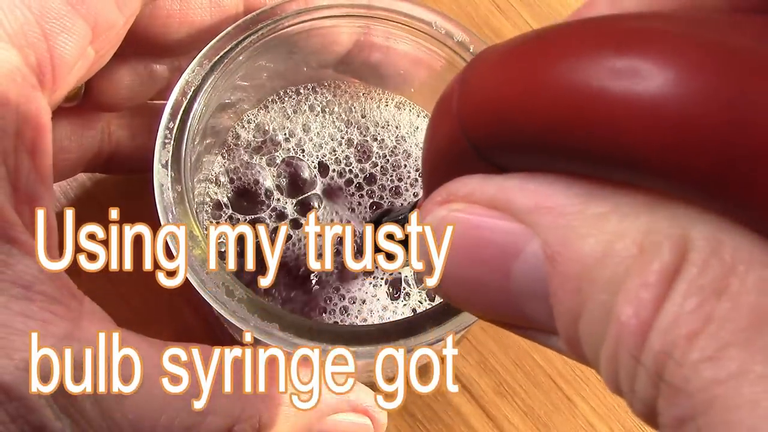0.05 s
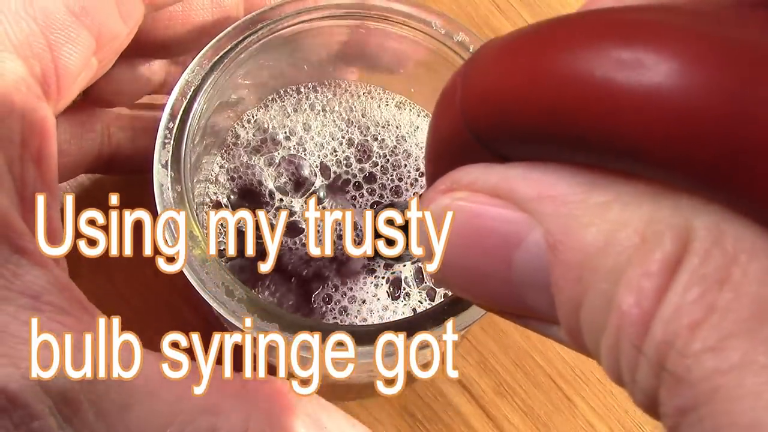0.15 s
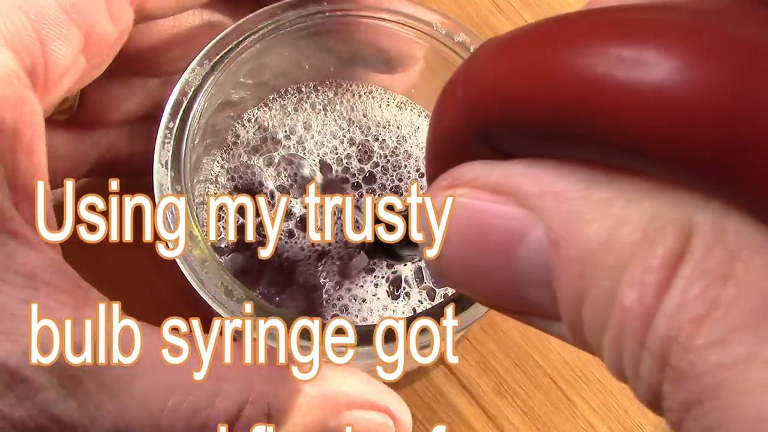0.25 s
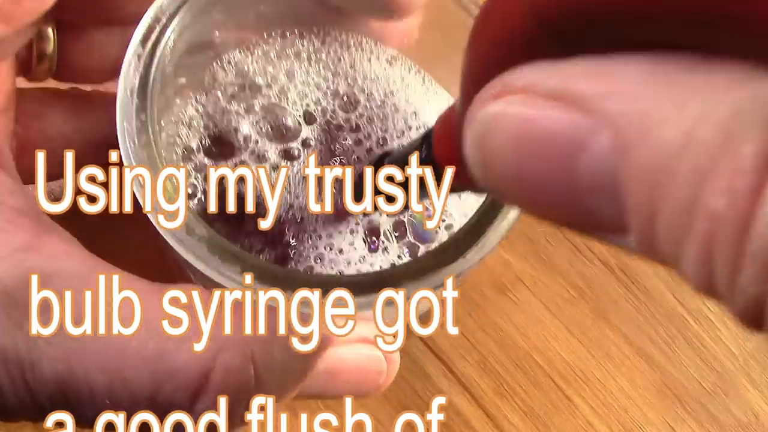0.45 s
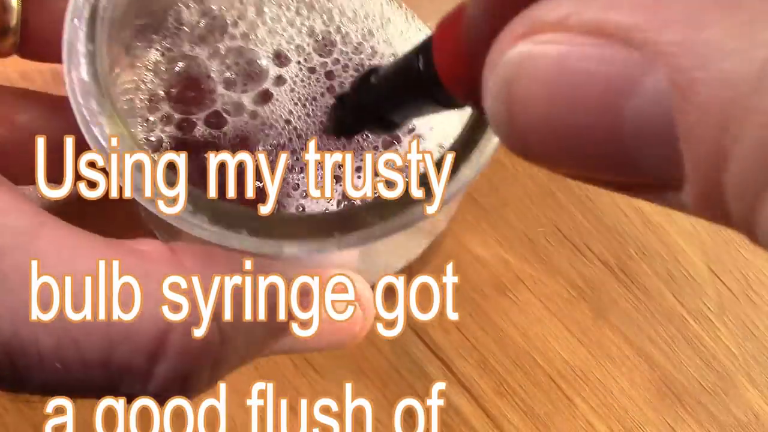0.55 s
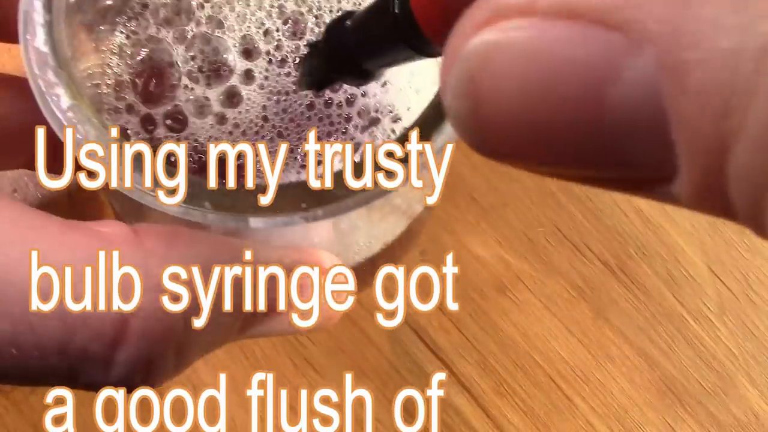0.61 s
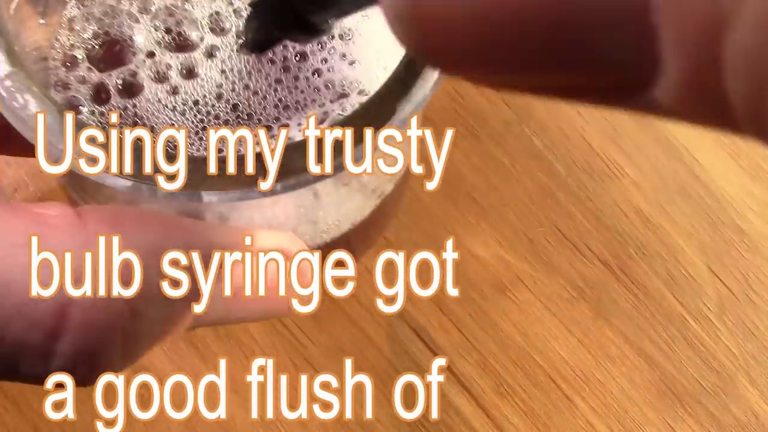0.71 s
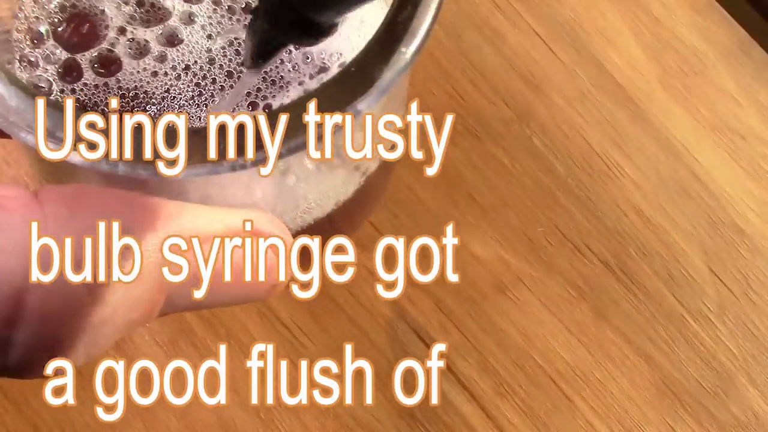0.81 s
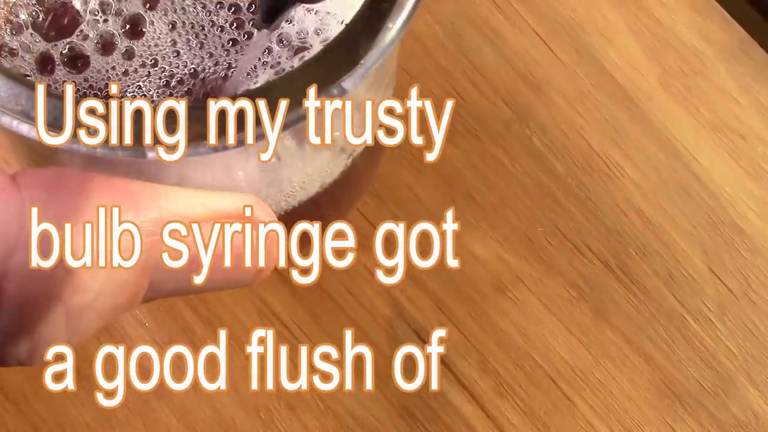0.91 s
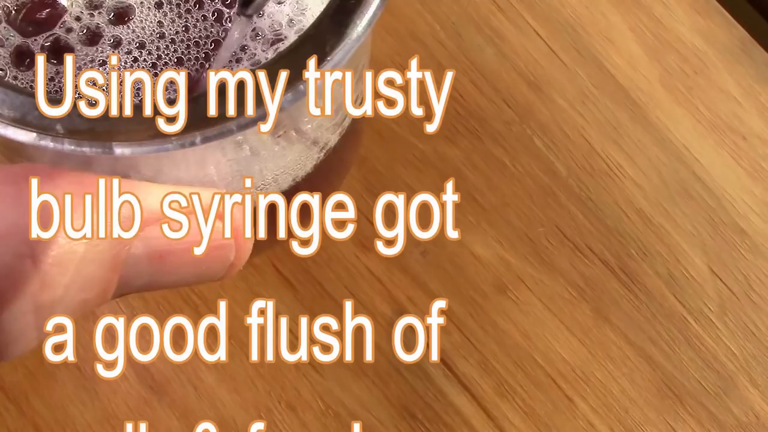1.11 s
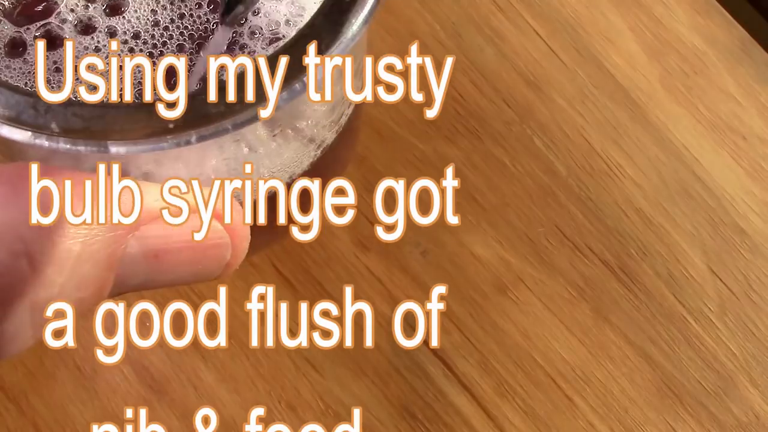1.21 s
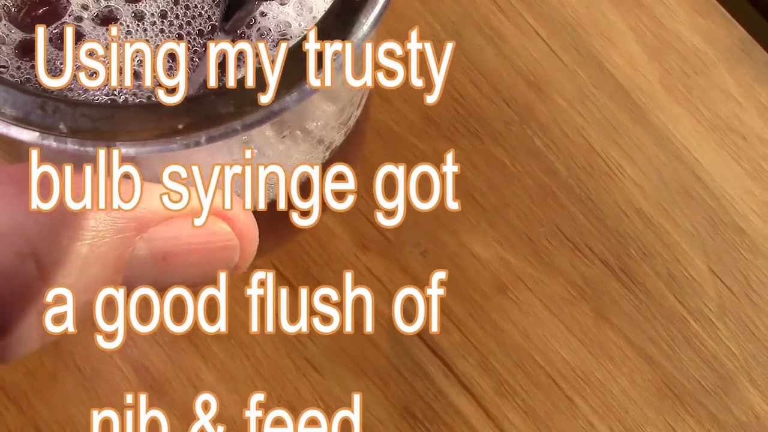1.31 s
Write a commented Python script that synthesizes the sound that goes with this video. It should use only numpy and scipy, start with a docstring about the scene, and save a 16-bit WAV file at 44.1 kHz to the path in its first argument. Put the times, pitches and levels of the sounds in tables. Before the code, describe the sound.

A bulb syringe spurts air into a cup of foamy liquid, close up. The rubber buckles with soft thuds around 0.2 seconds, followed by a light tick. From 0.4 to 0.6 seconds comes a loud hiss with rapid gurgling, ended by a sharp click. A faint whistle leaks near 0.8 seconds, then small bubbles plip and foam fizzes softly until about 1.35 seconds, over a low room hum.

```python
"""Indoors, in a small room, a rubber bulb syringe is squeezed into a cup of foamy liquid.
The bulb buckles with soft thuds and the nozzle ticks; air spurts out in a turbulent hiss and blows
a rapid gurgle of bubbles. A sharp click of hard parts ends the spurt and a thin leak whistles.
Then small bubbles plip and bursting foam fizzes, over a low room rumble and hum."""
import sys
import numpy as np
from scipy import signal
from scipy.io import wavfile

SR = 44100
rng = np.random.default_rng(int(sys.argv[2]) if len(sys.argv) > 2 else 0)


def dump_mix(stems):
    """Bounce the given channels to the path in sys.argv[1] as a 16-bit WAV at rate SR."""
    frames = np.atleast_2d(stems).T  # one column per channel
    limited = np.clip(frames, -1, 1)  # hard clip at full scale
    pcm = np.round(limited * 32767).astype(np.int16)
    wavfile.write(sys.argv[1], SR, pcm)


N = 59535
T = np.arange(N) / SR


# Air flow through the nozzle, the spurt's envelope: time_s, level_db
AIR_FLOW = [(0.405, -60), (0.416, -40), (0.422, -23.5), (0.436, -22.5), (0.447, -19.5), (0.470, -19),
            (0.505, -19.5), (0.527, -16.5), (0.550, -19.5), (0.578, -20.5), (0.590, -27.5), (0.607, -32),
            (0.618, -32.5), (0.630, -53)]
# Bubbles blown by the spurt: start_s, relative_peak_db, pitch_hz, swell_s
GULP_BUBBLES = [(0.4100, -25, 1400, 0.0027), (0.4183, -5, 1400, 0.0011), (0.4228, -19, 1530, 0.00079),
                (0.4270, -22, 1370, 0.0025), (0.4333, -4, 1520, 0.0007), (0.4397, -10, 1410, 0.0014),
                (0.4445, -10.5, 1390, 0.0014), (0.4485, -4.5, 1454, 0.0019), (0.4542, -18, 1430, 0.0026),
                (0.4610, -8, 1434, .003), (0.4768, -2.5, 1470, 0.0025), (0.4935, -4.5, 1490, 0.0016),
                (0.4982, -0.5, 1425, 0.0024), (0.5125, -6, 1320, 0.0026), (0.5190, -26, 1620, .002),
                (0.5308, -3, 1420, 0.0021), (0.5356, -13, 1380, 0.0024), (0.5465, -5, 1204, 0.0013),
                (0.5508, -15, 1320, 0.0013), (0.5632, -6, 1400, 0.002), (0.5688, 0, 1413, 0.0013),
                (0.5735, -18, 1380, 0.00079), (0.5794, -0.5, 1370, 0.0011), (0.5838, -3, 1444, 0.002),
                (0.5965, -11, 1367, .0016), (0.6010, -24, 1320, 0.0027), (0.6200, -9.5, 1340, 0.0012)]
def spurt():
    """Air rushes out of the nozzle, hissing, churning the liquid and blowing distinct gulps."""
    flow = level(AIR_FLOW)
    air = hiss(flow)
    churn = from_db(-3.5) * bubble_cloud(per_s=1200, hz=1400, spread=0.23, cycles=32)
    gulps = from_db(-4) * bubbles(GULP_BUBBLES)
    return flow * (air + churn) + gulps


# Tone colour of the rushing air: frequency_hz, density_db
HISS_COLOUR = [(150, -4.5), (400, -2.5), (700, -10), (1500, 1), (2000, -6), (2600, -13), (3200, -4.5),
               (3800, -6), (4500, -5), (5100, -5.5), (6100, -9), (7800, -2), (9500, -7.5), (12000, -6),
               (15000, -10)]
# Narrow resonances of bulb and nozzle: pitch_hz, width_hz, relative_db
NOZZLE_RESONANCES = [(776, 6.7, -22), (5520, 150, -13), (6067, 21, -13), (6900, 130, -22), (7900, 93, -30),
                     (9400, 20, -34), (11400, 32, -25.5), (14600, 40, -17.5)]
def hiss(flow):
    """Sputtering air noise with narrow resonances; the jet stands out more as the flow rises."""
    air = from_db(-4) * coloured_noise(HISS_COLOUR, flicker_db=2.5, flicker_hz=70)
    air += from_db(-4.5) * (flow / flow.max()) ** 0.79 * jet()
    for hz, width_hz, db in NOZZLE_RESONANCES:
        air += from_db(db) * noise_band(hz, width_hz)
    sputter_db = 1.18 * drift(250)
    return air * from_db(sputter_db)


# Sweep of the jet's broad resonance: time_s, centre_hz
JET_SWEEP = [(0.43, 5900), (0.455, 6300), (0.472, 6900), (0.485, 6000), (0.53, 6700), (0.575, 5500)]
def jet(width_hz=2100):
    """Turbulence in the nozzle rings around a wandering centre."""
    centre_hz = np.interp(T, *np.transpose(JET_SWEEP))
    phase = 2 * np.pi * np.cumsum(centre_hz) / SR
    a, b = lowpass(rng.standard_normal((2, N)), width_hz / 2)
    return rms_one(a * np.cos(phase) + b * np.sin(phase))


# The snap and its rebounds: start_s, level_db
CLICK_HITS = [(0.6246, -4), (0.6256, 1), (0.6274, -2.5), (0.6335, -19), (0.6477, -11.5), (0.6503, -12.5)]
# Ring of the hard parts: pitch_hz, relative_db, t60_s
CLICK_RING = [(1027, -15.5, 0.027), (1560, -36, .025), (2206, -17, 0.016), (2800, -19.5, 0.012),
              (3393, -11.5, 0.011), (4570, -9, 0.01), (5380, -9.5, 0.0082), (5900, -9.5, 0.011),
              (6420, -8.5, 0.021), (8390, -11.5, 0.0088), (9870, -15.5, 0.0082), (10130, -10.5, 0.007),
              (12200, -30, 0.0045)]
def click(crack_decay_s=0.00081, dull_below_db=-10):
    """Hard parts snap together with a brief crack and a short ring; weak rebounds are duller."""
    noise = from_db(-9) * rms_one(lowpass(rng.standard_normal(N), 10200))
    out = np.zeros(N)
    for start_s, db in CLICK_HITS:
        crack = burst(start_s, db, crack_decay_s) * noise
        hit = crack + struck([(start_s, db)], CLICK_RING)
        out += lowpass(hit, 9000) if db < dull_below_db else hit
    return out


# Quick slips of the rubber: start_s, level_db
BULB_SLIPS = [(0.2152, 7.5), (0.2210, -18), (0.2268, 7), (0.2325, 2.5), (0.2590, -6.5), (0.3585, -10)]
# Low body of the bulb: pitch_hz, relative_db, t60_s
BULB_RING = [(185.7, -32.5, 0.12), (319, -29.5, 0.049), (430, -23.5, 0.024), (587, -30, 0.005)]
def bulb_thuds():
    """The bulb buckles in a few slips, each a soft thud."""
    return struck(BULB_SLIPS, BULB_RING)


# Tick ahead of the spurt: start_s, level_db
TICK_HITS = [(0.3556, 1)]
# Ring of the nozzle: pitch_hz, relative_db, t60_s
TICK_RING = [(3420, -15.5, .0045), (6900, -19, 0.0019), (1690, -32, 0.012)]
def nozzle_tick():
    """One light hit rings the nozzle for an instant."""
    return struck(TICK_HITS, TICK_RING)


# Handling bumps: start_s, level_db, decay_s
CUP_BUMPS = [(0.2570, -36, 0.028), (0.3580, -32.5, 0.026), (0.632, -26.5, 0.024), (0.6856, -23.5, 0.0019),
             (0.737, -29, 0.0016)]
# Their dull colour: frequency_hz, density_db
BUMP_COLOUR = [(60, -9), (160, 3), (310, 4.5), (550, -7), (900, -19), (1500, -16.5), (3000, -32),
               (10000, -41)]
def cup_bumps():
    """Handling knocks the cup: dry thumps without a pitch."""
    return sum(burst(*bump) for bump in CUP_BUMPS) * coloured_noise(BUMP_COLOUR)


# Envelope of the rub: time_s, level_db
RUB_ENVELOPE = [(0.20, -67), (0.23, -40.5), (0.245, -45.5), (0.26, -70), (0.32, -69)]
# Its midrange colour: frequency_hz, density_db
RUB_COLOUR = [(400, -12), (1050, 3), (1600, 4), (3000, -5.5), (4500, -12), (12000, -22)]
def finger_rub():
    """Skin rubs on the rubber as the bulb buckles."""
    return level(RUB_ENVELOPE) * coloured_noise(RUB_COLOUR, flicker_db=5.3, flicker_hz=80)


# Bed of small bubbles in the cup: time_s, level_db
SIMMER_ENVELOPE = [(0, -50.5), (0.25, -56), (0.39, -61), (0.79, -52), (0.84, -45.5), (1.0, -42.5),
                   (1.1, -43), (1.35, -40.5)]
# Bubbles rising after the spurt: start_s, peak_db, pitch_hz, swell_s
PLIP_BUBBLES = [(0.8203, -26, 1670, 0.0016), (0.8336, -21.5, 1560, 0.0012), (0.8410, -30, 1440, 0.0017),
                (0.8555, -29.5, 1393, 0.0065), (0.8635, -24, 1300, 0.0014), (0.8803, -31, 1760, 0.0014),
                (0.8815, -29, 1196, 0.0031), (0.8935, -28.5, 1700, 0.0016), (0.8940, -29.5, 1140, 0.002),
                (0.9025, -29.5, 1155, 0.0024), (0.9370, -23.5, 1320, 0.00067),
                (0.9430, -29.5, 1530, 0.0024), (0.9495, -29.5, 1390, 0.0026), (0.9715, -34, 1480, 0.0013),
                (1.0158, -29.5, 1470, 0.0026), (1.0398, -26, 1450, 0.00073), (1.0510, -22.5, 1496, 0.0016),
                (1.0615, -24, 1550, 0.0013), (1.0667, -24, 1440, 0.0028), (1.0768, -21.5, 1386, 0.0052),
                (1.0888, -22, 1360, 0.0019), (1.1252, -23.5, 1470, 0.0011), (1.1368, -26, 1690, 0.0013),
                (1.1410, -34, 1266, 0.004), (1.1700, -30, 1310, 0.0046), (1.1853, -24.5, 1360, 0.0014),
                (1.1982, -25, 1610, 0.0012), (1.2215, -30.5, 1580, 0.0016), (1.2748, -24.5, 1460, 0.0015),
                (1.2915, -22.5, 1570, 0.00095)]
def bubbling():
    """Small bubbles ring in a soft simmer, with single plips on top."""
    simmer = bubble_cloud(per_s=820, hz=1478, spread=0.12, cycles=28)
    return level(SIMMER_ENVELOPE) * simmer + bubbles(PLIP_BUBBLES)


# Envelope of the fizz: time_s, level_db
FIZZ_ENVELOPE = [(0, -50), (0.27, -50), (0.33, -51), (0.41, -62), (0.80, -54), (0.86, -47.5), (0.96, -45),
                 (1.16, -44.5), (1.35, -48.5)]
# Weight of a pop by its pitch: pitch_hz, relative_db
FIZZ_COLOUR = [(2000, -7), (3200, 0.5), (5500, 4.5), (8000, 2.5), (11000, -8), (15000, -9)]
def foam_fizz():
    """Tiny bubbles burst in a dense fizz; a few ring longer, as pings."""
    pop_hz = np.geomspace(2000, 15500, 26)
    fizz = grains(pop_hz, gain_at(FIZZ_COLOUR, pop_hz), per_s=5000, cycles=7.5, spread_db=3)
    ping_hz = rng.uniform(4300, 9500, 24)
    pings = grains(ping_hz, gain_at(FIZZ_COLOUR, ping_hz), per_s=130, cycles=160, spread_db=3.5)
    return level(FIZZ_ENVELOPE) * (fizz + from_db(-8) * pings)


# Pops that stand out of the fizz: start_s, level_db, pitch_hz
FOAM_POPS = [(0.7965, -34, 6550), (0.8335, -31, 2460), (0.8733, -29, 4900), (0.9370, -26.5, 5170),
             (0.9485, -26.5, 2530), (0.9795, -27.5, 5170), (1.0173, -25.5, 4960), (1.0617, -30.5, 2980),
             (1.185, -27.5, 4800), (1.3220, -25.5, 3240)]
def foam_pops(t60_s=0.0046, snap_hz=7600):
    """A bubble's film bursts with a snap and rings briefly."""
    snap = (snap_hz, 0, t60_s / 10)
    return sum(struck([(s, db)], [(hz, 0, t60_s), snap], uneven_db=0) for s, db, hz in FOAM_POPS)


# Swell of the whistle: time_s, level_db
LEAK_ENVELOPE = [(0.72, -75), (0.745, -57), (0.80, -53), (0.83, -84)]
def nozzle_leak():
    """Air leaks at the nozzle in a thin, breathy whistle."""
    return level(LEAK_ENVELOPE) * noise_band(hz=2490, width_hz=75)


def cup_ring(liquid):
    """The air in the cup rings along with the bubbles."""
    return from_db(-6.5) * resonate(liquid, hz=1425, width_hz=45)


def room_reverb(x, t60_s=0.19, predelay_s=0.0017):
    """The small room answers with a short, diffuse, slightly dull tail."""
    tail = lowpass(rng.standard_normal(N), 8300) * (T > predelay_s) * from_db(-60 * T / t60_s)
    tail /= np.sqrt(np.sum(tail ** 2))
    return from_db(-14) * signal.fftconvolve(x, tail)[:N]


# Envelope of rumble and hum together: time_s, level_db
ROOM_ENVELOPE = [(0, -38), (0.2, -37.5), (0.4, -40.5), (0.68, -38.5), (0.85, -41.5), (1.35, -42)]
# Dark colour of the rumble: frequency_hz, density_db
RUMBLE_COLOUR = [(25, -3.5), (70, -0.5), (100, -5.5), (150, 0), (230, -17), (450, -16), (800, -20),
                 (2000, -38), (6000, -55), (15000, -48)]
# Hum tones, set against the rumble: pitch_hz, relative_db
HUM_TONES = [(75, -4), (150.5, -5.5)]
def room_tone():
    """A low, restless rumble with a hum of steady pitch."""
    hum = sum(from_db(db) * np.sin(2 * np.pi * (hz * T + rng.random())) for hz, db in HUM_TONES)
    rumble = coloured_noise(RUMBLE_COLOUR, flicker_db=2, flicker_hz=11.55)
    return level(ROOM_ENVELOPE) * (np.sqrt(2) * hum + rumble)


def bubbles(rows, steepness=1.89, sag=0.018):
    """Each bubble is a short tone that swells and dies, starting sharp and settling to its pitch."""
    out = np.zeros(N)
    for start_s, db, hz, swell_s in rows:
        age = np.maximum(T - start_s, 0) / swell_s
        turns = hz * swell_s * (age + sag * (1 - np.exp(-age)))
        envelope = (age * np.exp(1 - age)) ** steepness
        out += from_db(db) * envelope * np.sin(2 * np.pi * turns)
    return out


def bubble_cloud(per_s, hz, spread, cycles):
    """Many small bubbles around one pitch, weaker away from it; rms 1."""
    offsets = np.linspace(-1, 1, 11)
    pitches = hz * np.exp(spread * offsets)
    cloud = grains(pitches, from_db(-7 * offsets ** 2), per_s, cycles, spread_db=5)
    return rms_one(resonate(cloud, hz, width_hz=1150))


def grains(pitches, gains, per_s, cycles, spread_db):
    """Random pops of uneven size, each at one of the pitches, dying 60 dB over `cycles`; rms 1."""
    sizes = from_db(spread_db * np.minimum(rng.exponential(1, N), 4)) * rng.choice([-1, 1], N)
    pops = sizes * (rng.random(N) < per_s / SR)
    pitch_index = rng.integers(0, len(pitches), N)
    out = np.zeros(N)
    for k, (hz, gain) in enumerate(zip(pitches, gains)):
        width_hz = np.log(1000) / np.pi * hz / cycles
        out += gain * resonate(pops * (pitch_index == k), hz, width_hz) / hz
    return rms_one(out)


def struck(hits, modes, uneven_db=1):
    """Every hit rings every mode as a dying sine, its strength scattered by uneven_db."""
    start_s, db = np.transpose(hits)
    scatter_db = uneven_db * rng.standard_normal((len(hits), len(modes)))
    out = np.zeros(N)
    for k, (hz, mode_db, t60_s) in enumerate(modes):
        impulses = np.zeros(N)
        impulses[(start_s * SR).astype(int)] = from_db(db + mode_db + scatter_db[:, k])
        r, w = from_db(-60 / (t60_s * SR)), 2 * np.pi * hz / SR
        ring = signal.lfilter([0, np.sin(w)], [1, -2 * r * np.cos(w), r * r], impulses + 1e-18)
        out += (-1) ** k * ring
    return out


def coloured_noise(colour, flicker_db=0, flicker_hz=10):
    """Bands of noise, each with its own level and flicker; rms 1."""
    edges = np.geomspace(20, 18000, 41)
    white = rng.standard_normal((2, 2 * N))
    out = np.zeros(N)
    for k, (low, high) in enumerate(zip(edges, edges[1:])):
        bandpass = signal.butter(2, [low, high], "band", fs=SR, output="sos")
        band = signal.sosfilt(bandpass, white[k % 2])[N:]
        out += band * gain_at(colour, np.sqrt(low * high)) * from_db(flicker_db * drift(flicker_hz))
    return rms_one(out)


def noise_band(hz, width_hz):
    """Noise through one resonance; rms 1."""
    return rms_one(resonate(rng.standard_normal(N), hz, width_hz))


def resonate(x, hz, width_hz):
    """Band resonance with gain 1 at its peak."""
    r, w = np.exp(-np.pi * width_hz / SR), 2 * np.pi * hz / SR
    gain = (1 - r * r) / 2
    return signal.lfilter([gain, 0, -gain], [1, -2 * r * np.cos(w), r * r], x + 1e-18)


def lowpass(x, hz):
    """Gentle treble roll-off."""
    return signal.sosfilt(signal.butter(2, hz, fs=SR, output="sos"), x)


def burst(start_s, db, decay_s):
    """Envelope with an instant attack and an exponential decay."""
    return from_db(db) * (T >= start_s) * np.exp(-np.abs(T - start_s) / decay_s)


def drift(rate_hz):
    """Smooth random wander; rms 1."""
    knots = rng.standard_normal(4096)
    return rms_one(np.interp(T * rate_hz, np.arange(len(knots)), knots))


def level(envelope):
    """A dB envelope as gain at every sample."""
    return from_db(np.interp(T, *np.transpose(envelope)))


def gain_at(colour, hz):
    """Gain of a tone colour, read on a log-frequency axis."""
    points_hz, db = np.transpose(colour)
    return from_db(np.interp(np.log(hz), np.log(points_hz), db))


def from_db(db):
    """Decibels to gain."""
    return 10 ** (np.asarray(db) / 20)


def rms_one(x):
    """Scale to rms 1."""
    return x / np.sqrt(np.mean(x ** 2) + 1e-20)


def scene():
    """Syringe and cup up close, the room behind them; mono."""
    handling = nozzle_tick() + bulb_thuds() + cup_bumps() + finger_rub()
    liquid = spurt() + foam_fizz() + bubbling() + foam_pops()
    near = liquid + cup_ring(liquid) + click() + nozzle_leak() + handling
    return (near + room_reverb(near) + room_tone())[None]


def record(dry, ceiling=0.82, cutoff_hz=15900):
    """Soft-clip the highest peaks and cut the extreme top."""
    rounded = dry / (1 + np.abs(dry / ceiling) ** 6) ** (1 / 6)
    top_cut = signal.firwin(255, cutoff_hz, fs=SR, window="blackman")
    return signal.fftconvolve(rounded, top_cut[None], "same")


dry = scene()
out = record(dry)
dump_mix(out)
```